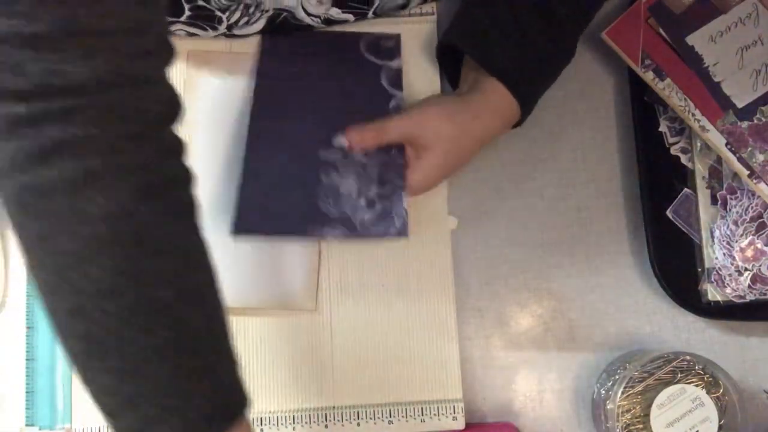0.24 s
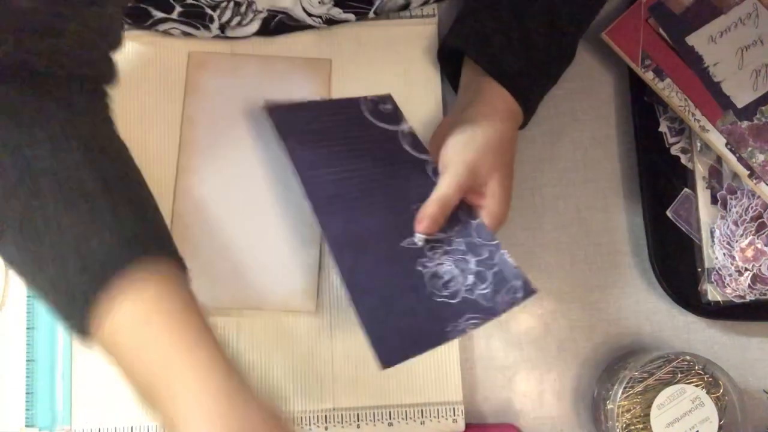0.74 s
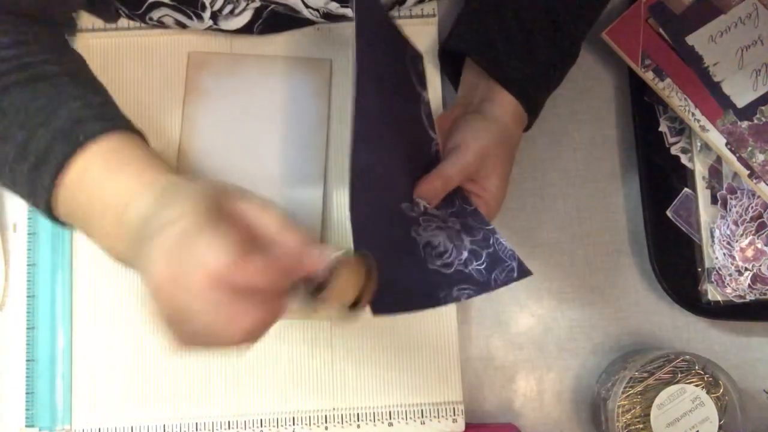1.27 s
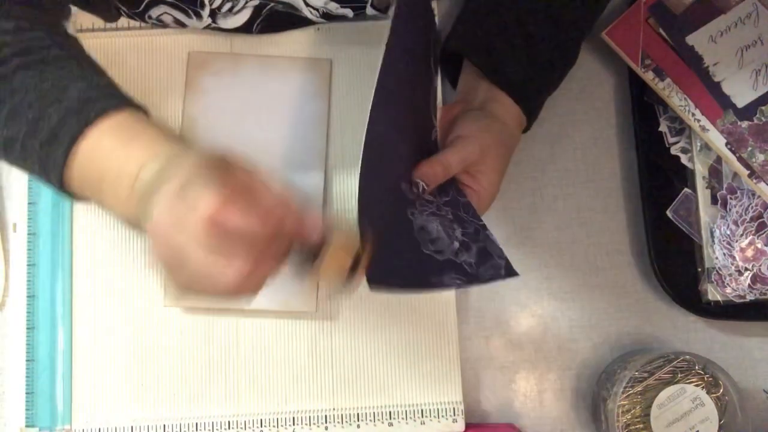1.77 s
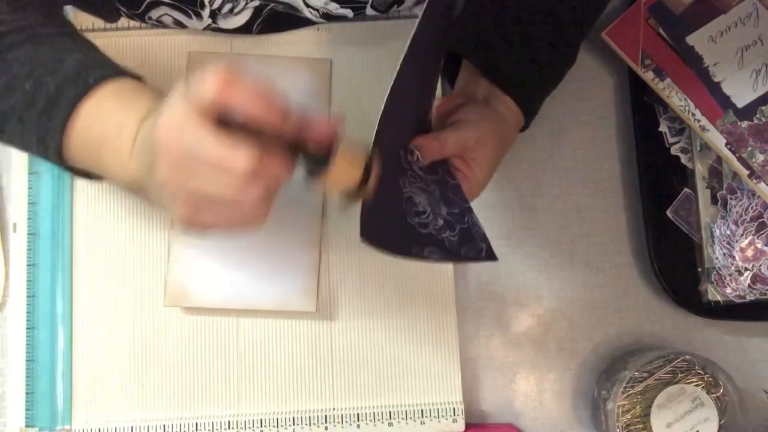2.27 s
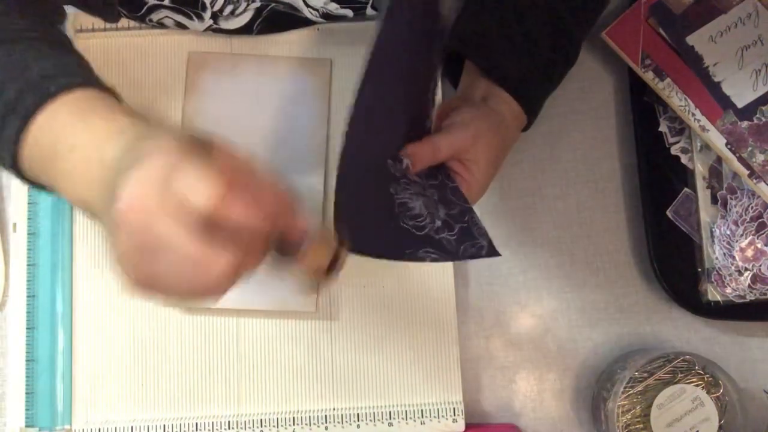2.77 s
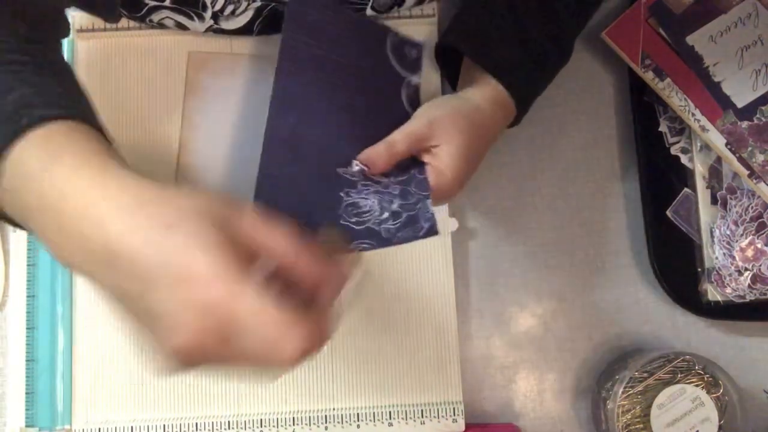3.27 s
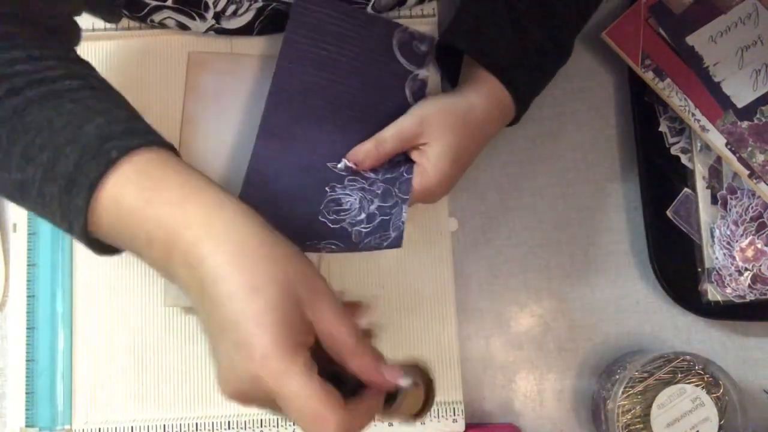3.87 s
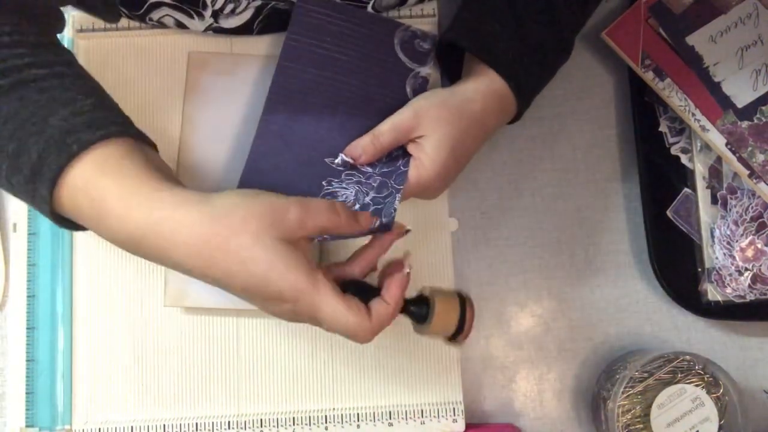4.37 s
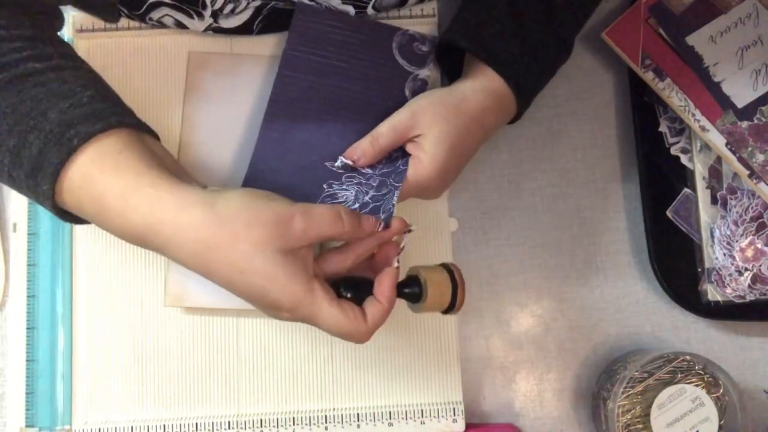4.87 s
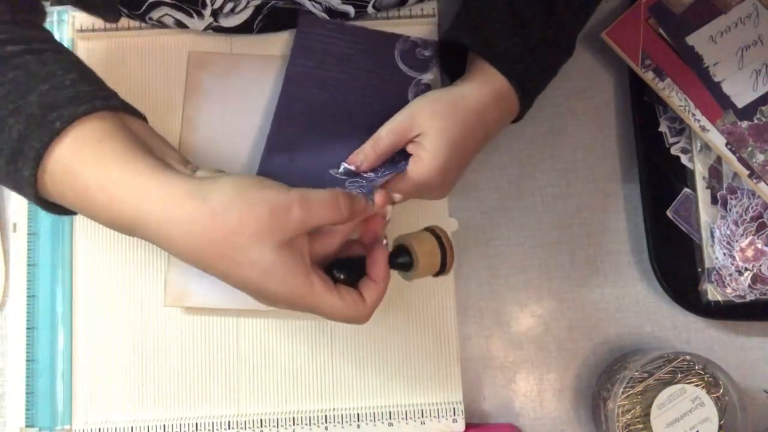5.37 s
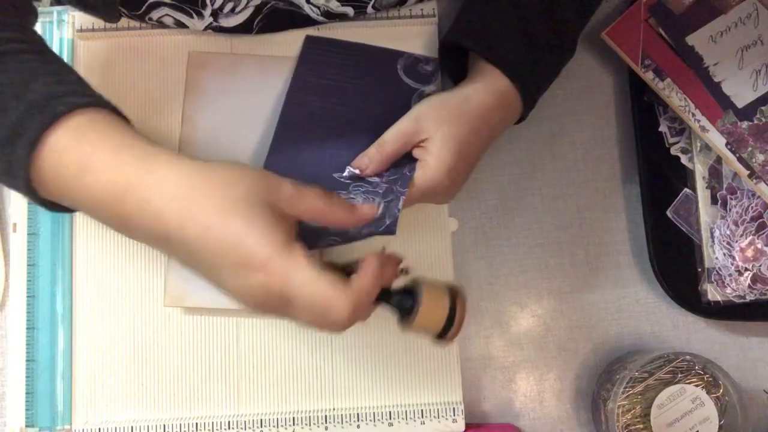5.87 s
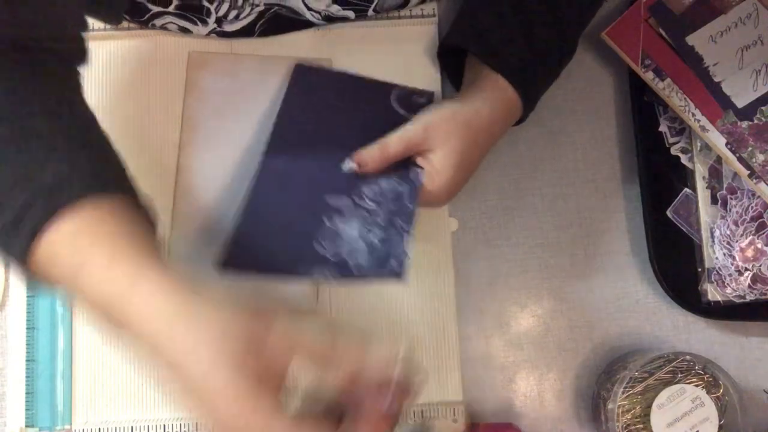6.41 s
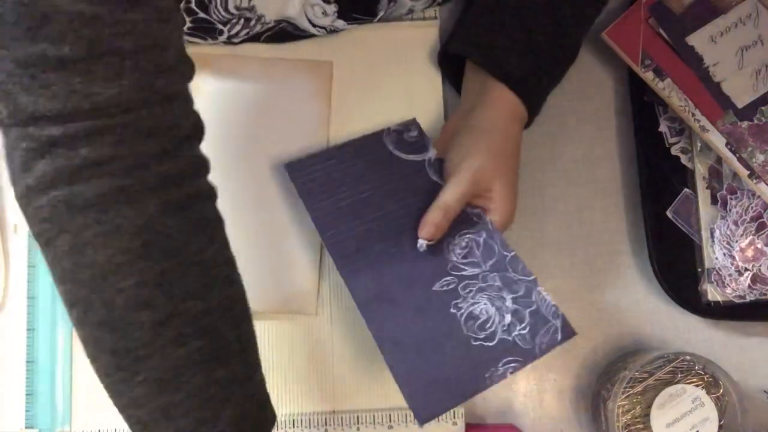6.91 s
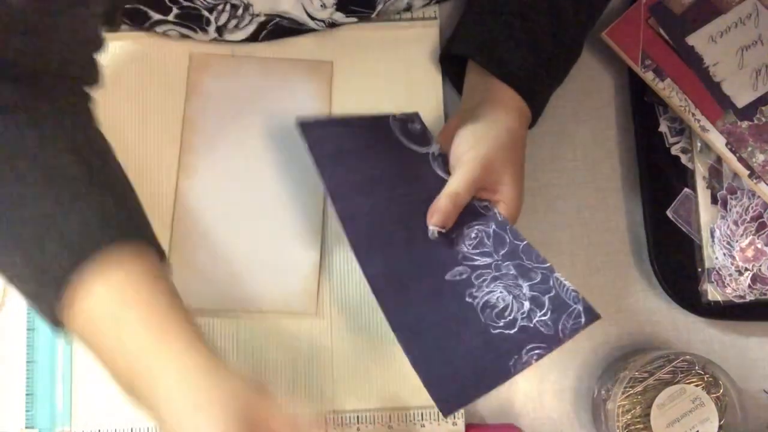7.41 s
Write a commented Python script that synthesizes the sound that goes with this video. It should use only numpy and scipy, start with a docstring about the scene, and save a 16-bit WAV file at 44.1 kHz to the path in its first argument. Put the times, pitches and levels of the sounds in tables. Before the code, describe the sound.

In a quiet room with a low distant engine hum, a sponge tool brushes a card edge in short strokes, one loud snap, then soft picking fingers.

```python
"""A quiet room with a distant engine hum, where hands work on a sheet of card at a table.
A sponge dauber strokes and brushes the card edge: patchy noise rings the card, booms and hisses. Fingers scuff
and pick at the card with rougher, crackling noise. Card flicks, one loud snap, thin ticks and knocks on the
table are short blows of fading tones and noise. Sleeves rustle, a thin hiss and higher hums come and go,
and diffuse echoes follow the hands."""
import sys
import numpy as np
from scipy import signal
from scipy.fft import rfft, irfft
from scipy.io import wavfile
from scipy.ndimage import uniform_filter1d

SR = 44100
rng = np.random.default_rng(int(sys.argv[2]) if len(sys.argv) > 2 else 0)


def unload_audio(sound):
    """Save the sound as a 16-bit wav file, at the path given as the first command line argument."""
    columns = np.transpose(np.atleast_2d(sound))
    # keep every value between -1 and 1, then stretch to whole-number steps
    steps = np.round(np.clip(columns, -1, 1) * 32767)
    wavfile.write(sys.argv[1], SR, steps.astype(np.int16))


N = 337365
T = np.arange(N) / SR  # time in seconds

# The ways the card sheet rings, before each touch changes them.
# Each row: pitch in Hz, level in dB, base time to fade by 60 dB in seconds.
CARD_MODES = [(820, -8, .025), (1201, 0.5, 0.02), (1567, -4, 0.027), (2090, -12, 0.019), (2368, -5.5, 0.06),
              (2740, -6.5, 0.056), (3210, -1, 0.013), (3747, -7, 0.02), (4200, -5, 0.0041),
              (4930, -14.5, 0.0063), (6700, -14.5, 0.015)]


def undb(db):
    """Turn decibels into an amplitude factor."""
    return 10 ** (np.asarray(db) / 20)


def unit(x):
    """Scale to an average (RMS) strength of 1."""
    return x / np.sqrt(np.mean(x ** 2))


def band(x, lo_hz, hi_hz):
    """Keep the sound between two pitches."""
    sos = signal.butter(2, [lo_hz, min(hi_hz, .45 * SR)], "bandpass", fs=SR, output="sos")
    return signal.sosfilt(sos, x)


def walk(rate):
    """Random levels, a new one every 1 / rate seconds, with straight slides from each to the next; RMS near 1."""
    hold = max(int(SR / rate), 1)
    steps = np.repeat(rng.standard_normal(N // hold + 1), hold)
    return unit(uniform_filter1d(steps, hold)[:N])


def grit(patchy_db, rate):
    """Countless tiny slips: noise whose strength jumps about."""
    return rng.standard_normal(N) * undb(patchy_db * walk(rate))


def ring(x, modes):
    """A steady sound sets damped resonances ringing."""
    out = 0
    for hz, db, t60 in modes:
        pole = np.exp(2j * np.pi * hz / SR - np.log(1000) / (t60 * SR))
        out = out + undb(db) * signal.lfilter([1], [1, -pole], x).imag
    return out


def bent_card():
    """The sheet is held and bent differently each time: its modes shift and change weight."""
    drawn = rng.standard_normal((len(CARD_MODES), 2))
    return [(hz * (1 + .04 * shift), db + 2.5 * weight, t60)
            for (hz, db, t60), (shift, weight) in zip(CARD_MODES, drawn)]


def blow(modes, crack=(), damping=0.94, scatter_db=2.5, push_s=0.00031, late_s=0):
    """One blow: strong modes, newly weighted and tuned, over fading noise for the dense rest; peak 1."""
    t = T[:SR // 4]

    def since(hz):
        # below 1000 Hz, deeper parts arrive later
        return np.maximum(t - late_s * np.maximum(np.sqrt(1000 / hz) - 1, 0), 0)

    def fade(hz, t60):
        return undb(-60 * since(hz) * damping / t60) * (1 - np.exp(-since(hz) / push_s))

    hz, db, t60 = np.transpose(modes)[:, :, None]
    sign, weight, detune = rng.standard_normal((3, len(modes), 1))
    strength = np.sign(sign) * undb(db + scatter_db * weight)
    tones = strength * np.sin(2 * np.pi * hz * (1 + .02 * detune) * since(hz))
    x = (tones * fade(hz, t60)).sum(axis=0)
    x = x / np.abs(x).max()
    for lo_hz, hi_hz, crack_db, crack_t60 in crack:
        noise = band(band(rng.standard_normal(len(t)), lo_hz, hi_hz), lo_hz, hi_hz)
        x = x + undb(crack_db) * fade(np.sqrt(lo_hz * hi_hz), crack_t60) * unit(noise)
    return x / np.abs(x).max()


def add(out, start, x):
    """Mix a short sound in at its start time."""
    i = int(start * SR)
    out[i:i + len(x)] += x[:N - i]


def played(rubs, colour, rise_s, t60):
    """Each rub sets in quickly, ramps in level and dies away after contact; its colour is drawn anew."""
    # Shares of a rub's level ramp, in order: body, second layer, treble.
    ramp_shares = (0.99, 0.83, 0.68)
    out = np.zeros(N)
    for start, length, db, fall_db, *layers_db in rubs:
        span = slice(int(start * SR), int((start + length + 0.099) * SR))
        t = T[span] - start
        ramp_db = fall_db * (.5 - np.clip(t / length, 0, 1))
        mix = 0
        for layer, layer_db, share in zip(colour(span), [0, *layers_db], ramp_shares):
            mix = mix + undb(layer_db + share * ramp_db) * unit(layer)
        rise = 1 - np.exp(-(t - t[0]) / rise_s)
        out[span] += rise * undb(db - 60 * np.maximum(t - length, 0) / t60) * mix
    return out


def tone(hz, *db):
    """A slightly wavering tone, one level for each harmonic."""
    phase = 2 * np.pi * np.cumsum(hz * (1 + .008 * walk(6.1))) / SR
    harmonics = [undb(level + 1.4 * walk(4.3)) * np.sin(k * phase) for k, level in enumerate(db, 1)]
    return np.sqrt(2) * sum(harmonics)


def air():
    """Room tone and microphone hiss are shaped noise; the bass rumble swells slowly."""
    # The colour of the quiet room. Each row: pitch in Hz, relative level in dB per Hz.
    spectrum = [(25, -18.5), (45, -14), (66, -12), (85, -16), (120, -18), (170, -21), (290, -30),
                (445, -25.5), (600, -33.5), (1200, -37), (2200, -41.5), (4800, -52.5), (5700, -46.5),
                (6600, -52), (13500, -56), (14600, -59.5), (15200, -76.5)]
    level_db = -66.5  # of the part above the bass
    f = np.maximum(np.fft.rfftfreq(N, 1 / SR), 1)
    hz, db = np.transpose(spectrum)
    x = irfft(rfft(rng.standard_normal(N)) * undb(np.interp(np.log(f), np.log(hz), db)), N)
    swell = undb(2.5 * walk(3))
    swelling = x + band(x, 25, 300) * (swell - 1)
    return undb(level_db) * swelling / np.std(band(x, 250, 15000))


def engine_hum():
    """The distant engine: a low tone and its octave, gliding in pitch and level."""
    # The engine's pitch before wavering. Each row: time in seconds, pitch in Hz.
    pitch = [(0, 46), (2.2, 48.5), (3.8, 50.5), (5.4, 52), (7.4, 52), (7.65, 49)]
    # The base tone before wavering. Each row: time in seconds, level in dB.
    level = [(0, -59.5), (.36, -57), (.62, -62.5), (1.66, -55), (2.0, -60.5), (2.5, -54.5), (3.68, -51.5),
             (3.81, -57.5), (4.92, -54.5), (5.07, -63), (5.2, -55.5), (5.47, -52.5), (5.58, -62),
             (5.86, -53.5), (6.48, -52.5), (6.55, -48), (7.05, -45.5), (7.13, -41), (7.44, -45.5),
             (7.54, -56)]
    # The second harmonic before wavering. Each row: time in seconds, level in dB.
    octave = [(5.8, -80), (6.3, -62), (6.55, -56.5), (7.05, -52.5), (7.17, -57), (7.4, -55), (7.55, -68)]
    return tone(*(np.interp(T, *np.transpose(curve)) for curve in (pitch, level, octave)))


def sleeves():
    """Sleeves and moving card rustle faintly throughout: patchy noise at a drifting level."""
    # Rustle strength. Each row: time in seconds, level in dB.
    levels = [(0.0, -73), (0.55, -68), (1.62, -79), (2.9, -74.5), (3.75, -76.5), (4.39, -77.5), (4.54, -75),
              (5.62, -69.5), (5.78, -80), (6.05, -78), (6.29, -62.5), (6.54, -73), (7.37, -75),
              (7.65, -73.5)]
    return unit(band(grit(1.8, 27), 630, 5100)) * undb(np.interp(T, *np.transpose(levels)))


def fingers():
    """Skin sticks and slips unevenly and fibres crackle; the cupped card favours two broad regions."""
    # Fingers scuffing on the card.
    # Each row: start in seconds, length in seconds, level in dB, treble against level in dB.
    scuffs = [(0.006, 0.045, -56.5, -15), (0.076, .13, -64.5, -1.5), (0.312, 0.033, -47, -21),
              (0.364, .14, -59.5, -18), (0.522, .02, -54.5, -24), (0.58, 0.14, -67.5, -4.5),
              (0.786, .018, -59.5, -9.5), (0.853, 0.067, -64.5, -12), (0.901, 0.017, -47, -4),
              (1.096, 0.038, -62, -6.5), (1.33, 0.019, -57, -16), (1.519, .012, -58.5, -14),
              (3.694, 0.051, -59, -18), (3.998, 0.017, -62.5, -1), (4.337, 0.1, -66.5, -19),
              (4.463, 0.024, -57, -16), (4.511, 0.017, -53.5, -30), (4.568, 0.049, -56, -25),
              (4.633, 0.052, -58.5, -15.5), (4.76, 0.084, -68, -12), (4.854, 0.021, -49.5, -28),
              (4.917, 0.12, -56.5, -20.5), (5.154, 0.064, -59, -13), (5.296, 0.022, -59.5, -28),
              (5.432, 0.14, -61.5, -14.5), (5.588, 0.016, -48, -17), (5.642, 0.037, -56.5, -11.5),
              (5.694, 0.068, -59, -10), (6.025, .045, -64.5, -21), (6.131, 0.231, -62, -10),
              (6.267, 0.11, -62.5, 1.5), (6.822, 0.066, -65, -5), (7.562, 0.06, -62, -14.5)]
    crackle = (rng.random(N) < 150 / SR) * rng.standard_normal(N) * 12.5  # about 150 a second
    skin, paper, hiss = (grit(3.34, 60) * undb(0.72 * walk(500)) + crackle for _ in range(3))

    def colour(span):
        ringing = band(ring(skin[span], bent_card()), 950, 1840)
        low = unit(ringing) + 1.43 * unit(band(skin[span], 297, 2000))
        middle = 0.8 * unit(band(paper[span], 3050, 3950)) + unit(band(paper[span], 2400, 5500))
        return low, middle, band(hiss[span], 4200, 12700)

    # picking at the corner: 20 small scuffs, one at random in each equal slice of time
    first_s, last_s, count = 4.33, 5.65, 20
    picks = []
    for k, (when, size, force) in enumerate(rng.random((count, 3))):
        start = first_s + (k + when) / count * (last_s - first_s)
        picks.append((start, 0.065 * (.5 + size), -68 + (4 * force - 2), -19.5))
    rubs = []
    for start, length, db, treble_db in scuffs + picks:
        fall_db = 11.5 - 49 * length  # longer scuffs fall less; the longest stay almost level
        middle_db = 2.5 + 0.56 * treble_db
        rubs.append((start, length, db, fall_db, middle_db, treble_db))
    return played(rubs, colour, rise_s=0.0067, t60=0.047)


def knocks():
    """Knocks ring the table top and thud through it; bending waves bring the deep parts later."""
    # Each row: start in seconds, ringing peak in dB, thud against that in dB, brightness in dB per octave.
    strikes = [(0.067, -23, -26, -0.5), (0.323, -32.5, 0, -1.5), (0.464, -41, -5.5, 0.5),
               (0.52, -43.5, -28, 6.5), (2.033, -42.5, -21, -3.5), (3.239, -38, -14.5, -3),
               (3.41, -42, -11, 13), (3.449, -35.5, -15, -7.5), (3.638, -26.5, -19, 2.5),
               (3.654, -34.5, -33.5, 1), (5.619, -37.5, -11.5, -5), (6.833, -42.5, -2, -4),
               (7.006, -29, -10, 1.5)]
    # Table ringing. Each row: pitch in Hz, level in dB, base time to fade by 60 dB in seconds.
    table_modes = [(264, -0.5, 0.025), (491, 3.5, 0.043), (598.5, -7, 0.12), (792, -2, 0.093),
                   (1016, -6, 0.057), (1334, -4, 0.044), (1580, -11, 0.049), (1930, -3.5, 0.01),
                   (2337, -12.5, 0.053), (3100, -16, 0.036), (3610, -15, 0.03)]
    # Deep thud. Each row: pitch in Hz, level in dB, base time to fade by 60 dB in seconds.
    thud_modes = [(73, 6, 0.28), (146, 1, 0.12), (222.3, 2.5, 0.12)]
    # Table noise. Each row: low edge in Hz, high edge in Hz, level in dB, base 60 dB fade in seconds.
    table_noise = [(238, 516, -15, 0.17), (443, 1650, -6.5, 0.063), (1420, 8600, -27, 0.081)]
    bending_s = 0.00588  # a 250 Hz part arrives this late
    out = np.zeros(N)
    for start, db, thud_db, tilt_db in strikes:
        modes = [(hz, level + tilt_db * np.log2(hz / 700), t60) for hz, level, t60 in table_modes]
        knock = blow(modes, table_noise, push_s=0.00028, late_s=bending_s)
        add(out, start, undb(db) * knock)
        add(out, start, undb(db + thud_db) * blow(thud_modes, push_s=0.0017, late_s=bending_s))
    return out


def flicks():
    """The card flicks free, favouring the modes near each flick's centre pitch."""
    # Each row: start in seconds, peak in dB, centre in Hz.
    releases = [(0.301, -41.5, 1150), (0.907, -31.5, 1180), (0.977, -30.5, 2100), (1.164, -36.5, 830),
                (1.726, -54.5, 2300), (1.984, -56, 2320), (2.272, -52.5, 2186), (2.61, -35.5, 3320),
                (2.831, -41, 1050), (3.181, -38, 1110), (3.224, -35.5, 1030), (3.397, -42, 1210),
                (4.466, -49, 1140), (4.573, -41, 1200), (4.715, -47, 1100), (4.859, -41, 1120),
                (4.92, -41.5, 1184), (5.007, -41, 3500), (5.084, -45, 1044), (5.152, -51, 1230),
                (5.301, -49, 1250), (5.481, -41.5, 1130), (5.605, -29, 1480), (5.689, -33.5, 1276),
                (5.746, -28.5, 1360), (6.045, -48.5, 1376), (6.358, -35, 1170)]
    # Card noise. Each row: low edge in Hz, high edge in Hz, level in dB, base 60 dB fade in seconds.
    card_noise = [(900, 3000, -13, 0.049), (2920, 7000, -15, 0.034)]
    out = np.zeros(N)
    for start, db, centre_hz in releases:
        modes = [(hz, level - 13 * np.log2(hz / centre_hz) ** 2, t60) for hz, level, t60 in CARD_MODES]
        add(out, start, undb(db) * blow(modes, card_noise, damping=1.4, push_s=.0004))
    return out


def ticks():
    """A fingernail or the tool handle ticks: two short, bright tones with a little noise."""
    # Each row: start in seconds, peak in dB.
    taps = [(0.7933, -49.5), (3.9479, -47), (3.9669, -44.5), (4.0191, -37), (6.5417, -48), (6.7976, -52.5),
            (6.842, -45)]
    # Tick tones. Each row: pitch in Hz, level in dB, base time to fade by 60 dB in seconds.
    tick_modes = [(3650, -2, 0.0072), (5500, -5, 0.01)]
    # Tick noise. Each row: low edge in Hz, high edge in Hz, level in dB, base 60 dB fade in seconds.
    tick_noise = [(2370, 9600, -10, 0.035)]
    out = np.zeros(N)
    for start, db in taps:
        add(out, start, undb(db) * blow(tick_modes, tick_noise, push_s=0.00018))
    return out


def sponge():
    """Foam pores catch on the edge: the slips ring the card, boom in the sheet and hiss in the air."""
    # Strokes along the card edge, with a few very short ticks and brushes.
    # Each row: start in seconds, length in seconds, level in dB,
    # nominal level lost from start to end in dB, bass against level in dB.
    strokes = [(0.927, 0.055, -44, -1, -5.5), (1.133, 0.035, -40.5, -4, -8), (1.359, 0.027, -40.5, 5, -8),
               (1.53, 0.0089, -49, 12, -5), (1.557, 0.025, -43.5, -4.5, -12),
               (1.782, 0.049, -43.5, -1, -14), (2.006, 0.081, -49.5, -12.5, -19),
               (2.315, 0.074, -48, 1.5, -12), (2.573, .044, -46.5, 1.5, -11.5),
               (2.801, 0.035, -44.5, -7, -10.5), (2.984, .035, -45.5, 3, -13.5),
               (3.172, 0.06, -49, -1, -0.5), (3.392, 0.044, -51.5, -4, 5), (3.595, 0.044, -53.5, -6.5, 2.5),
               (3.646, .018, -54, 12, -1), (7.615, 0.033, -48.5, 12, -1.5)]
    treble_db = -14  # against level
    pressed = .4  # share of their base ring time that the card's modes keep under the sponge
    slips, boom, hiss = grit(2.2, 200), grit(3., 80), grit(2.2, 120)

    def colour(span):
        modes = [(hz, db, pressed * t60) for hz, db, t60 in bent_card()]
        card = unit(ring(slips[span], modes)) + 0.62 * unit(band(slips[span], 1900, 5000))
        return band(card, 1600, 8000), band(boom[span], 240, 1400), band(hiss[span], 6200, 12000)

    rubs = [(*row, treble_db) for row in strokes]
    return played(rubs, colour, rise_s=0.012, t60=0.048)


def drones():
    """Higher hums: each glides evenly, swells to its peak, sinks and fades out at the ends."""
    # Each row: start in seconds, loudest moment in seconds, end in seconds,
    # start pitch in Hz, end pitch in Hz, peak level in dB before wavering.
    glides = [(1.303, 2.6, 3.7, 112.5, 121.2, -62), (3.8, 4.356, 4.9, 119.5, 115.5, -56)]
    swell_db = 11.5  # from the ends to the peak
    out = 0
    for start, top, end, start_hz, end_hz, db in glides:
        edges = np.clip(np.minimum(T - start, end - T) / .1 + 1, 0, 1)
        level_db = db + np.interp(T, [start, top, end], [-swell_db, 0, -swell_db])
        out = out + edges * tone(np.interp(T, [start, end], [start_hz, end_hz]), level_db)
    return out


def thin_hiss():
    """A thin hiss near one pitch comes and goes: patchy noise in a narrow band."""
    # Each row: start in seconds, length in seconds, level in dB, nominal level lost from start to end in dB.
    spells = [(2.14, 0.73, -75.5, 4), (7.45, .2, -73, -4)]
    thin = band(grit(2.0, 30), 2190, 2360)
    return played(spells, lambda span: [thin[span]], rise_s=0.038, t60=.15)


def snap():
    """The stiff card corner snaps back once: a loud burst of short tones and noise."""
    # Snap tones. Each row: pitch in Hz, level in dB, base time to fade by 60 dB in seconds.
    snap_modes = [(2356, 1, 0.013), (3030, -5, 0.021), (4254, -5.5, 0.013), (4755, -5, 0.019)]
    # Snap noise. Each row: low edge in Hz, high edge in Hz, level in dB, base 60 dB fade in seconds.
    snap_noise = [(259, 940, -25.5, 0.087), (810, 1900, -22, 0.064), (2100, 5600, -12, .045),
                  (5700, 11000, -24, 0.015), (2100, 5800, -6, .008)]
    start_s, peak_db = 3.0238, -3
    out = np.zeros(N)
    add(out, start_s, undb(peak_db) * blow(snap_modes, snap_noise, scatter_db=0.8, push_s=0.00021))
    return out


def room(x):
    """Diffuse echoes that build up after the first wall is reached, then die away."""
    level_db, t60_s, gap_s = -23.5, .33, 0.028
    t = T[:SR // 2]
    tail = rng.standard_normal(len(t)) * undb(-60 * t / t60_s) * (1 - np.exp(-(t / gap_s) ** 2))
    tail = band(tail, 2600, 9000)
    return undb(level_db) * signal.fftconvolve(x, tail / np.sqrt(np.sum(tail ** 2)))[:N]


def scene():
    """Mix the hands and their echoes with the rustles, hums and room air."""
    hands = fingers() + knocks() + flicks() + ticks() + sponge() + snap()
    background = air() + engine_hum() + sleeves() + drones() + thin_hiss()
    return (hands + room(hands) + background)[None]


def record(dry):
    """The recorder steeply cuts the sound above 15900 Hz."""
    return signal.sosfilt(signal.ellip(10, .2, 60, 15900, fs=SR, output="sos"), dry)


dry = scene()
out = record(dry)
unload_audio(out)
```